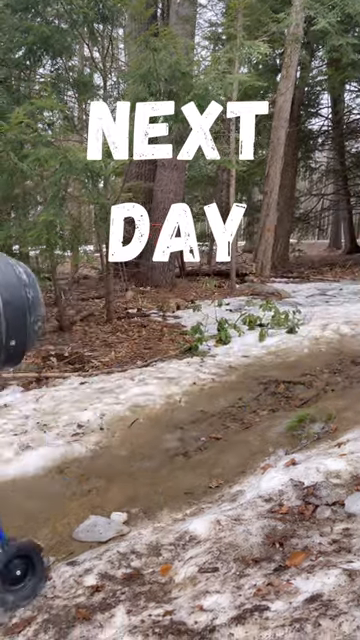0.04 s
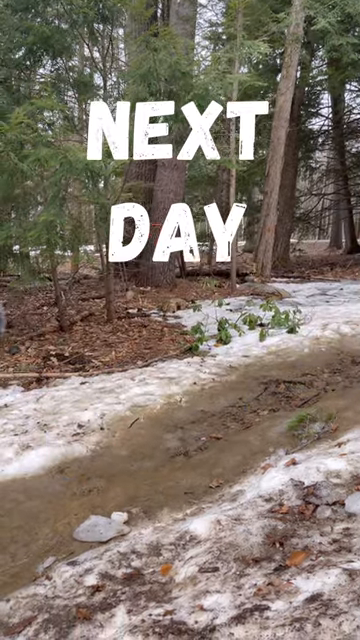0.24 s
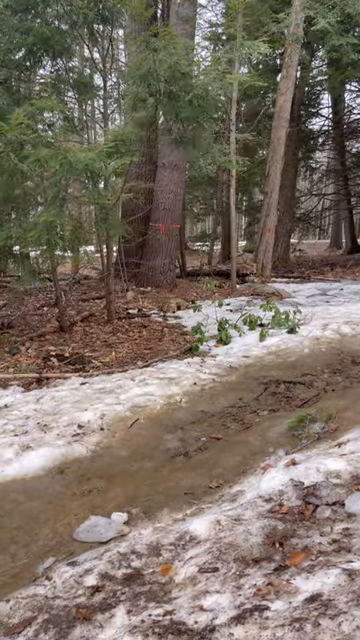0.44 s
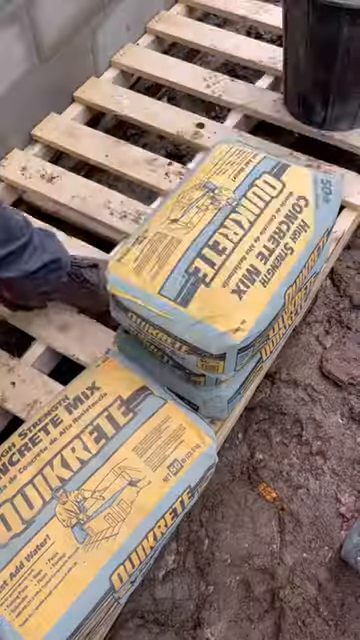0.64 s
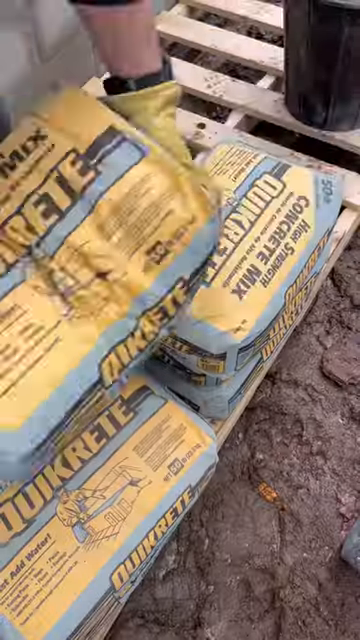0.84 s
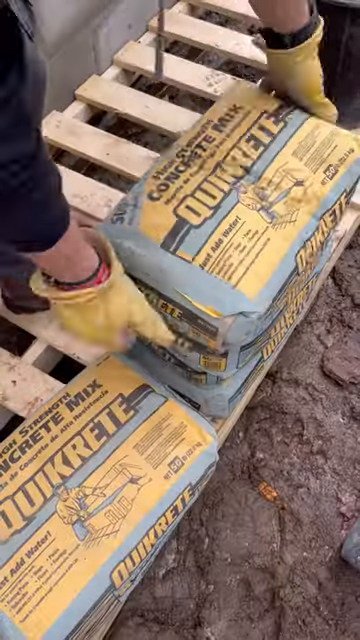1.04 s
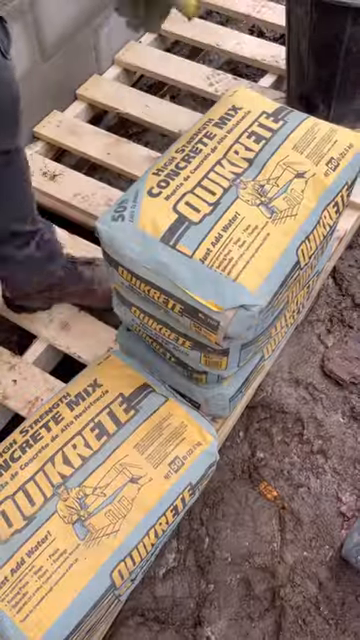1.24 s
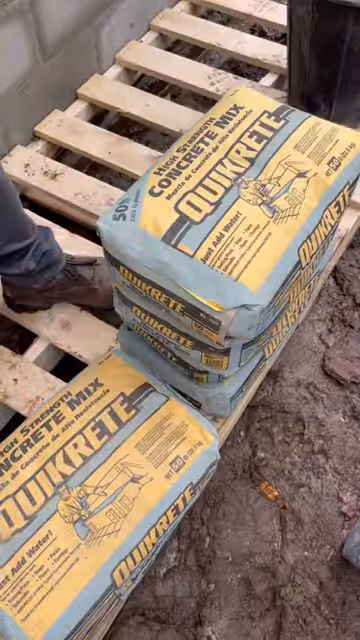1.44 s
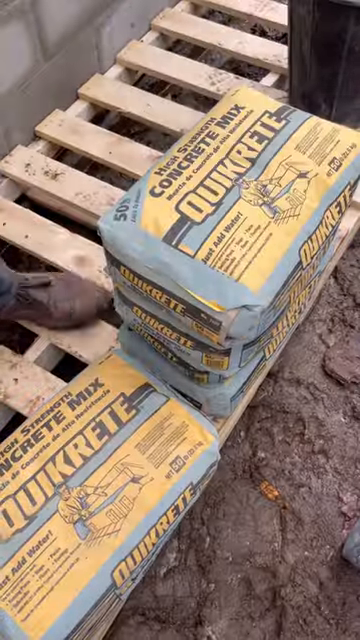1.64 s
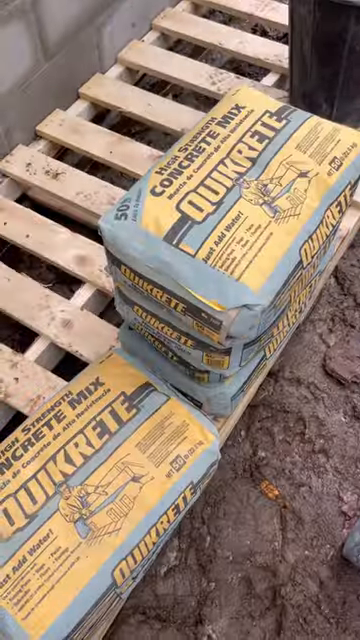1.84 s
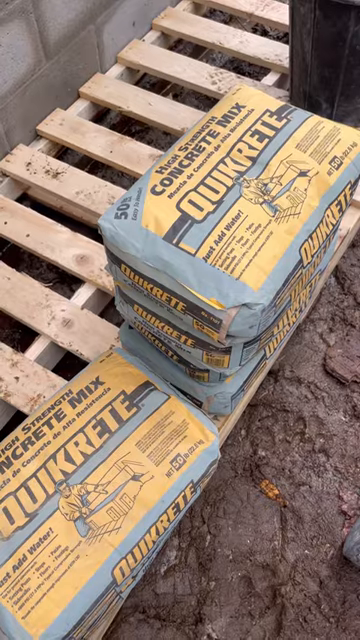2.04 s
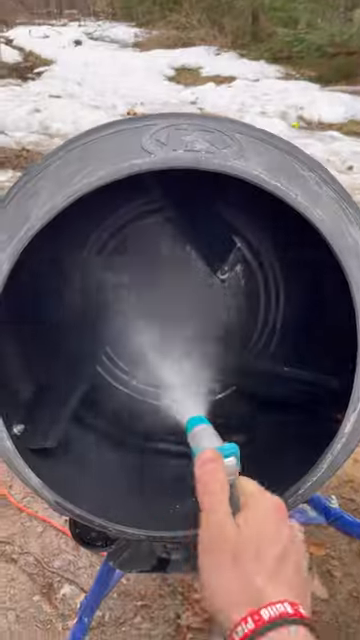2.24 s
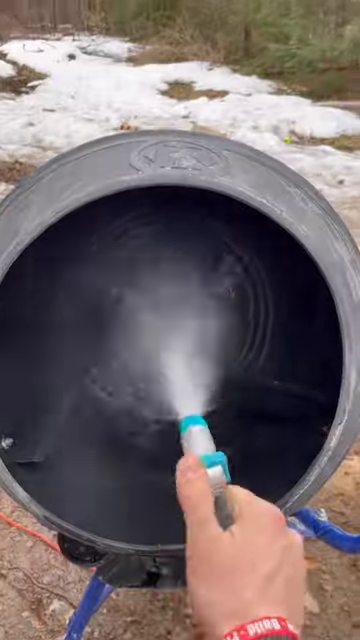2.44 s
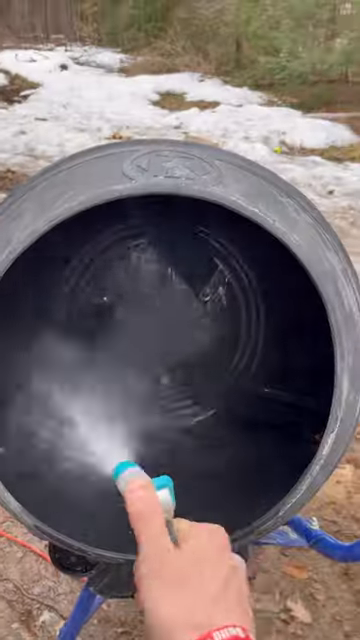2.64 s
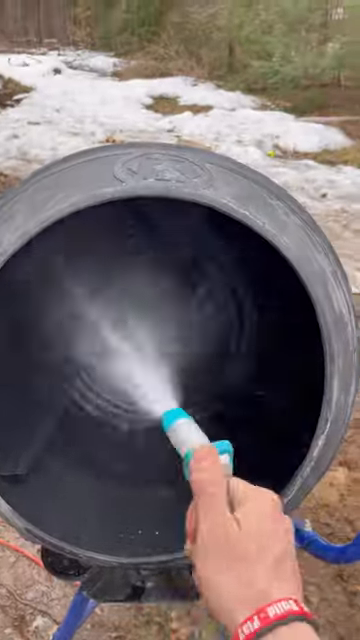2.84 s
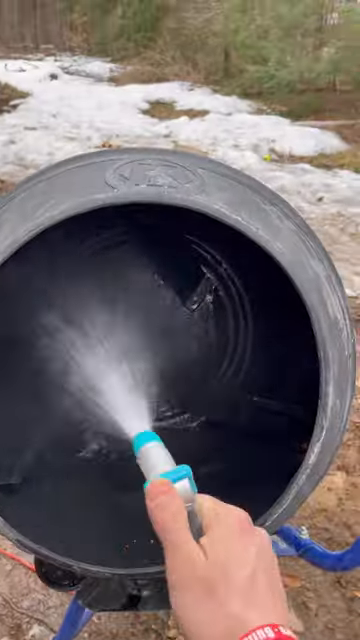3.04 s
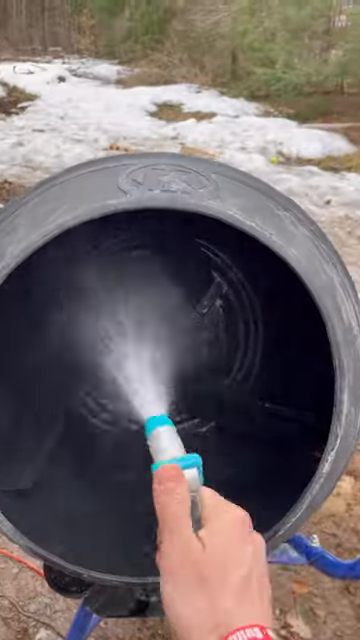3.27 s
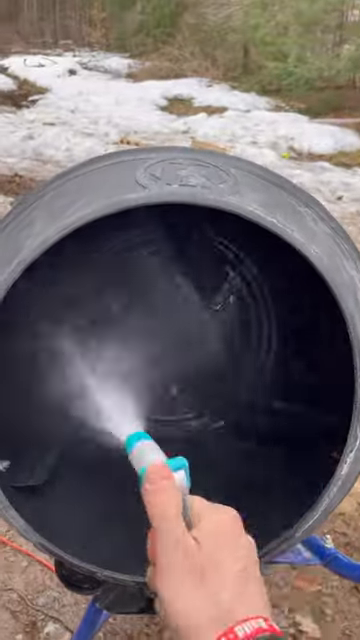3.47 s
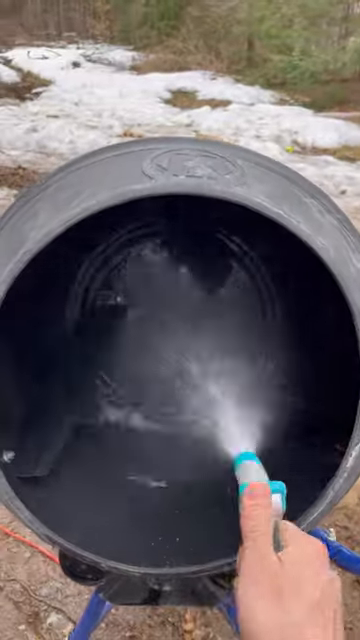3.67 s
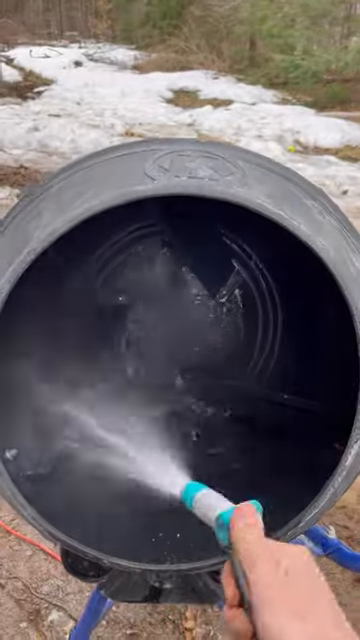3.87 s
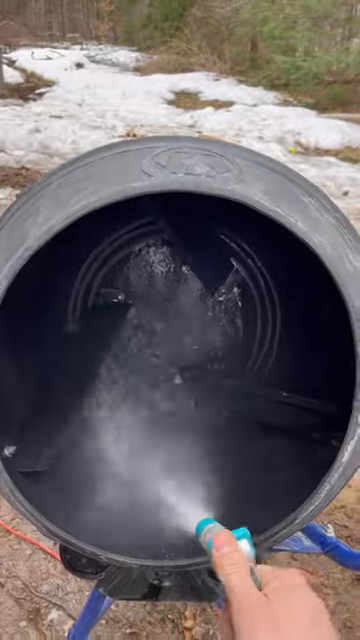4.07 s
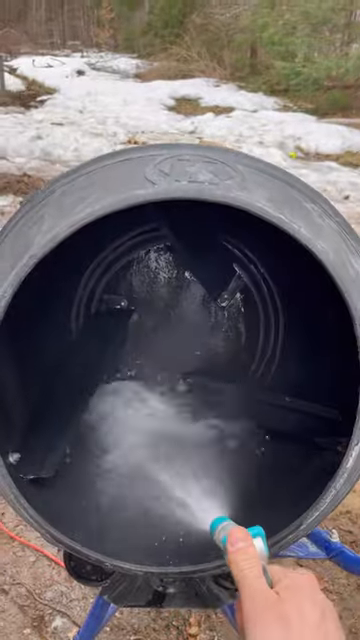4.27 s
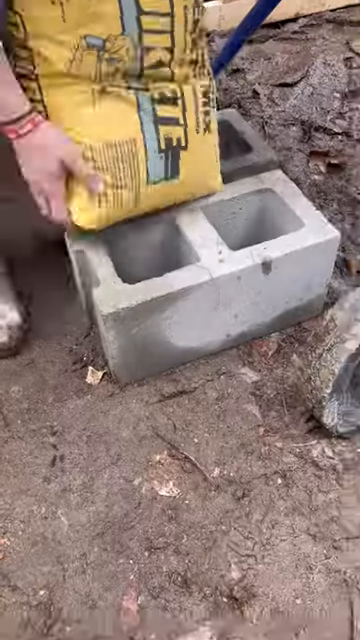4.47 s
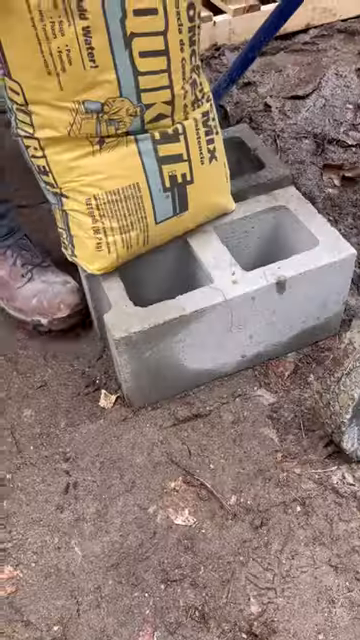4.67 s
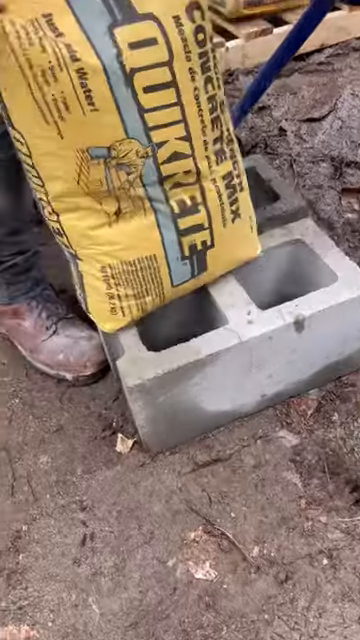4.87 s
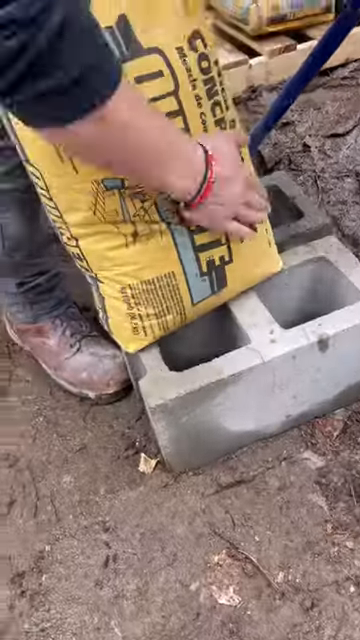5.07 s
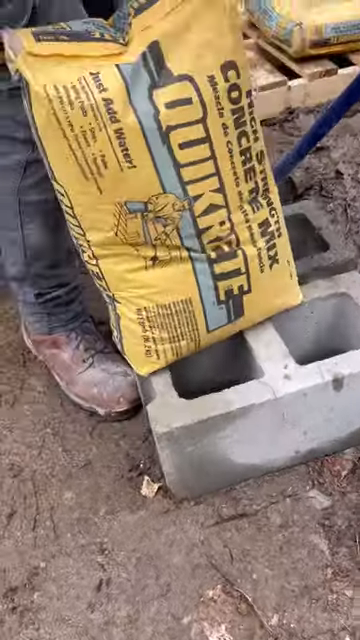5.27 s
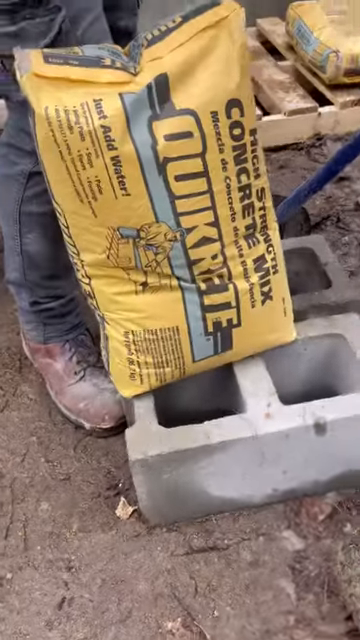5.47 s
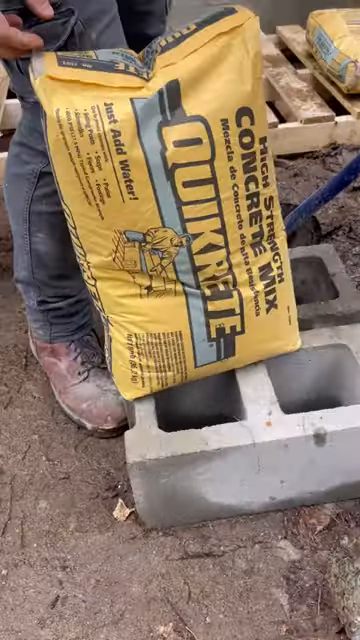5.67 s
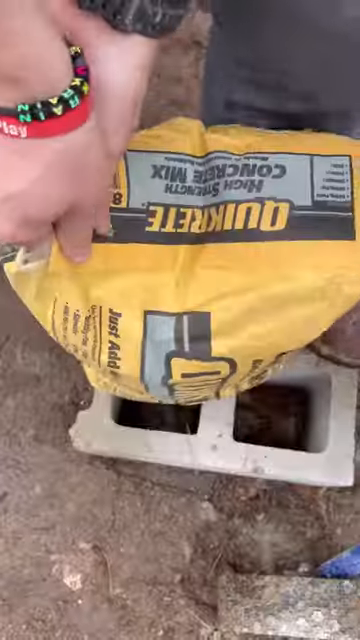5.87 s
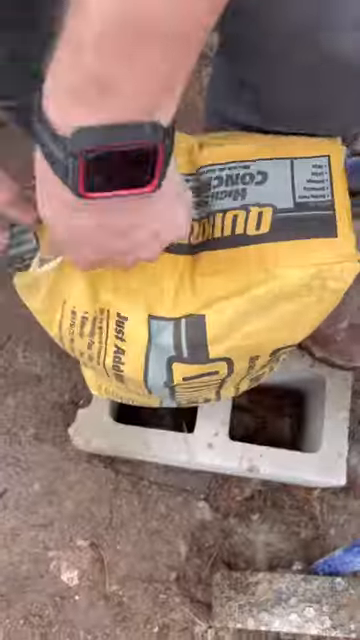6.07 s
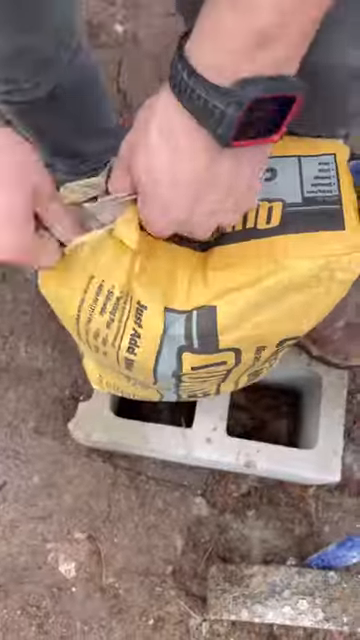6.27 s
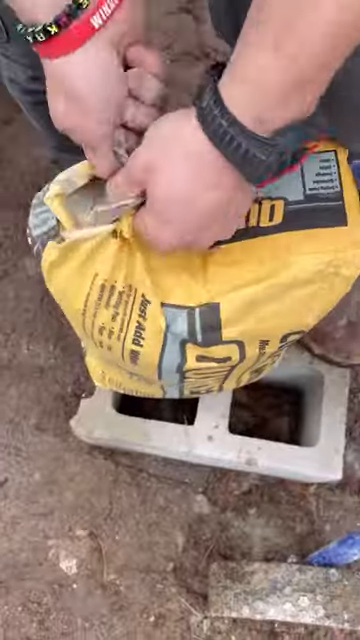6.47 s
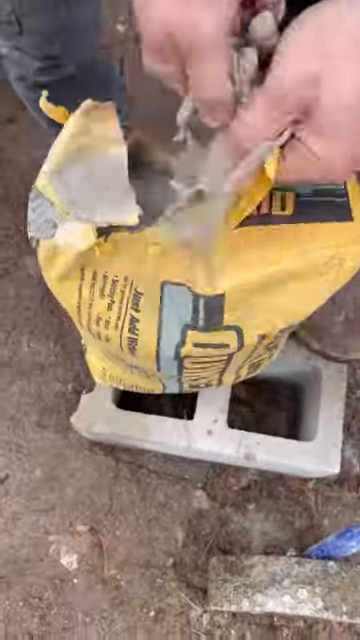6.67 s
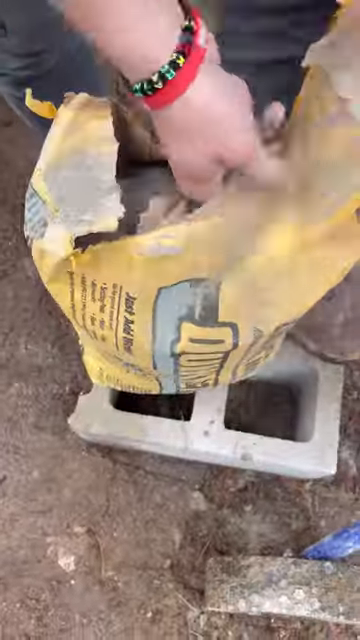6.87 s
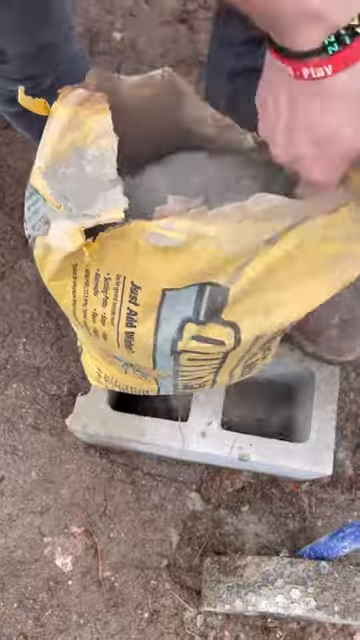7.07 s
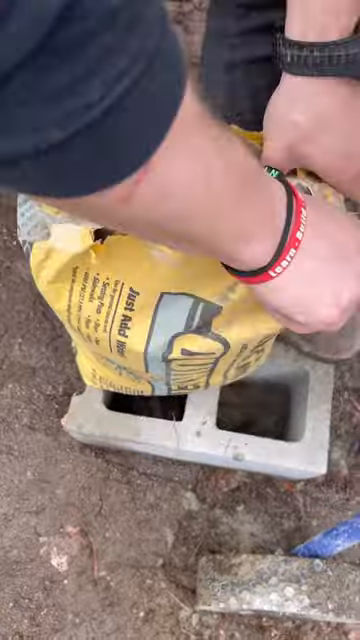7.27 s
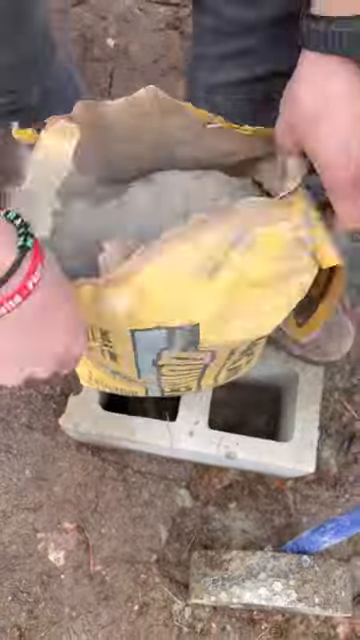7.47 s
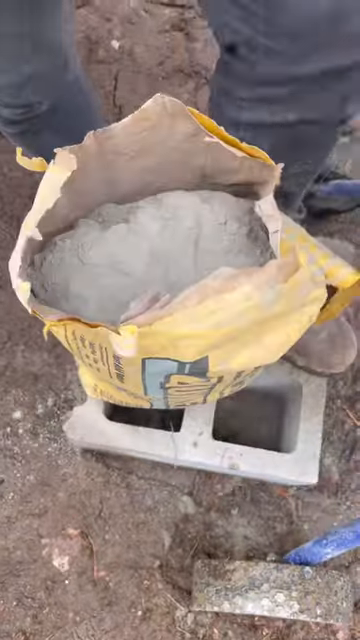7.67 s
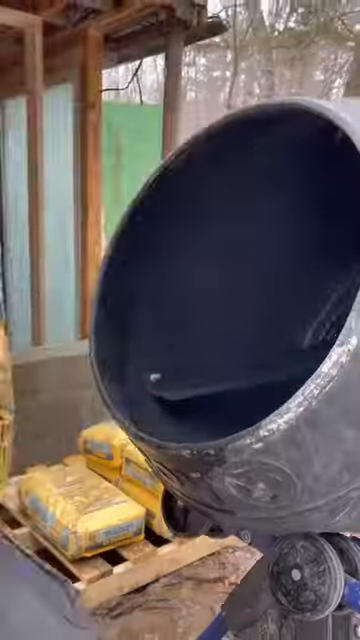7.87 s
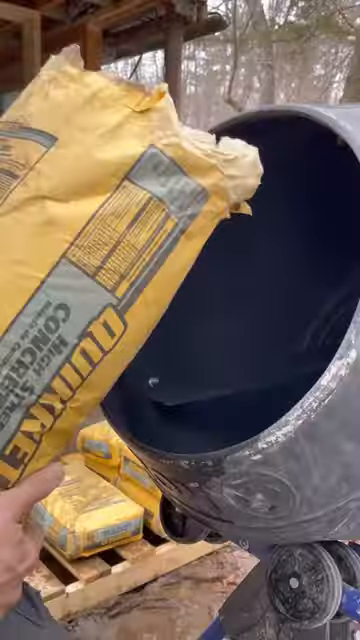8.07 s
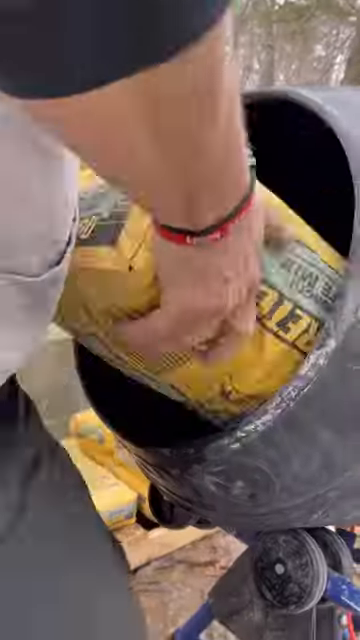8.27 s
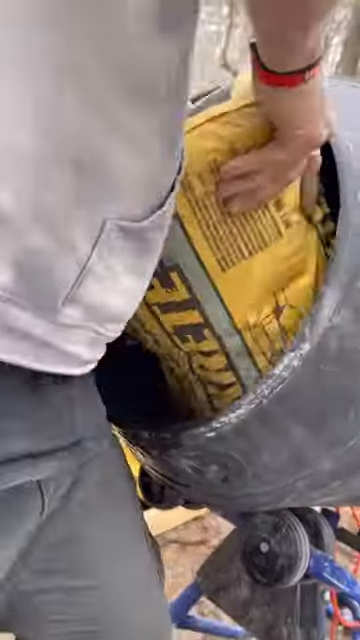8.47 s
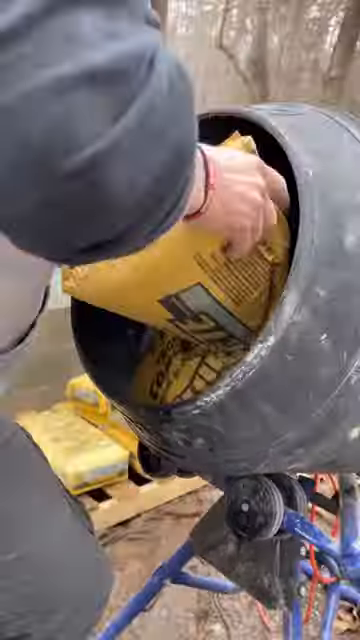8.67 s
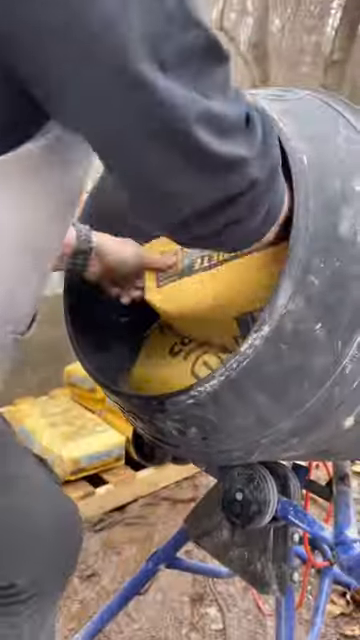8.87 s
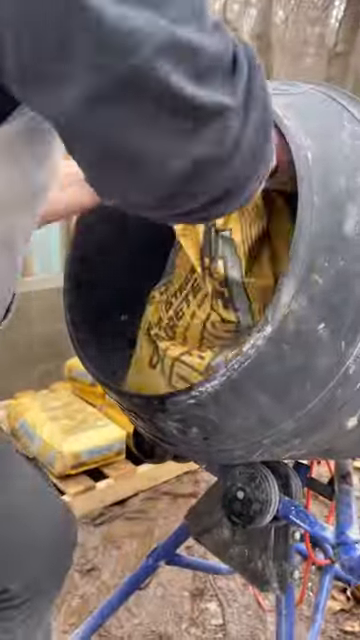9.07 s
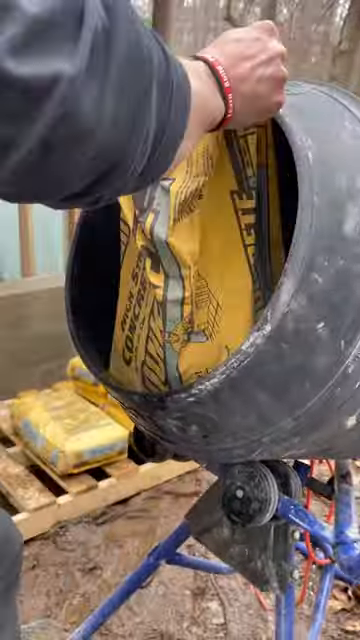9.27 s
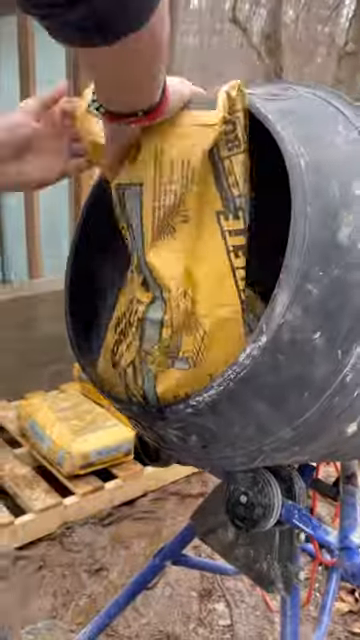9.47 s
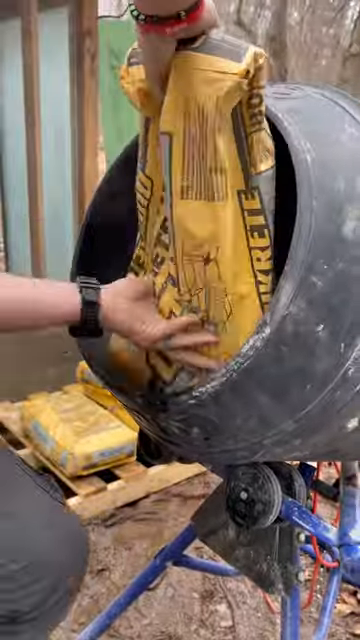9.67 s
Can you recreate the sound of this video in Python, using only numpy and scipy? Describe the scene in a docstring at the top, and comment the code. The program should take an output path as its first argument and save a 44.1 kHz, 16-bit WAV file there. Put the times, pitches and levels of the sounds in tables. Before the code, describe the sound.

Close, dry outdoor sound in hard-cut scenes over very faint air. From 0 to 0.6 s a wheeled mixer rattles: hollow metallic knocks, a wavering low drum boom and gritty snow crunch. Until 2.1 s, cloth and boots scuff softly over a faint low drone; a heavy bag lands with a deep scraping thud at 1.05, with a few small snaps and a dull knock near 2.05. At 2.2 a trigger clicks and spray hisses, fluttering and splattering in a hollow plastic drum, brighter after 4.0, stopping at 4.4. A paper bag then knocks and crackles onto a block. From 5.8 to 7.7 sharp creases snap, fibres rip in short dense bursts and panels pop, with tiny squeaks at 7.8. From 8.1 the bag rustles hollowly in the drum; gritty mix rushes at 8.3, thinning after 8.8, with a loud snap at 8.76 and shakes until 9.7.

```python
"""A heavy paper bag of dry concrete mix is stood on a block and torn open: creases crack, fibres break in
dense runs, panels buckle with dull pops. It is heaved into a drum, where grains of mix slide out.
Before that, in short scenes, a portable mixer knocks and rings over snow and rough ground, a bag thuds on
a stack of others, and a hose sprays hissing, splattering noise into the empty plastic drum.
A faint outdoor background and a low drone lie underneath."""
import sys
import numpy as np
from scipy import signal
from scipy.fft import rfft, irfft
from scipy.io import wavfile
from scipy.ndimage import uniform_filter1d

SR = 44100
rng = np.random.default_rng(int(sys.argv[2]) if len(sys.argv) > 2 else 0)


def wav_out(sig):
    """Save sig, one row per channel (or a flat mono array), as 16-bit PCM at SR to the path in sys.argv[1]."""
    wavfile.write(sys.argv[1], SR, np.round(np.clip(np.atleast_2d(sig).T, -1, 1) * 32767).astype(np.int16))


N = 428652
TIME = np.arange(N) / SR
TRIGGER_S, SPRAY_END_S = 2.214, 4.393   # the hose trigger is pulled, and the spray ends


def from_db(db):
    """Turn decibels into a gain."""
    return 10 ** (np.asarray(db) / 20)


def rms_one(x):
    """Scale a sound so that its average (rms) level is 1."""
    return x / np.sqrt(np.mean(x ** 2) + 1e-20)


def during(start_s, end_s):
    """1 between two times, else 0."""
    return (TIME >= start_s) * (TIME < end_s) * 1.0


def gains(rows):
    """Turn each dB column of a curve into a gain that moves with time."""
    s, *columns = np.transpose(rows)
    return [from_db(np.interp(TIME, s, column)) for column in columns]


def swells(rows, edge_s):
    """Turn each dB column of (start_s, length_s, level_db..) strokes into a gain with soft edges."""
    out = np.zeros((len(rows[0]) - 2, N))
    for s, length, *levels in rows:
        first, last = max(int(s * SR), 0), int((s + length) * SR)
        out[:, first:last] += from_db(levels)[:, None]
    return uniform_filter1d(out, max(int(edge_s * SR), 1), axis=1)


def add(out, s, sound):
    """Mix a short sound in at time s."""
    at = int(np.clip(s * SR, 0, N - 1))
    out[at:at + len(sound)] += sound[:N - at]


def colour(x, spectrum, size=4096):
    """Filter a sound to follow a (pitch_hz, level_db) curve, with no sound ahead of its cause."""
    hz, db = np.transpose(spectrum)
    grid = np.maximum(np.fft.rfftfreq(size, 1 / SR), 1)
    log_gain = np.log(from_db(np.interp(np.log(grid), np.log(hz), db)))
    # folding the cepstrum gives the minimum-phase filter
    cepstrum = irfft(log_gain)
    cepstrum[1:size // 2] *= 2
    cepstrum[size // 2 + 1:] = 0
    return signal.oaconvolve(x, irfft(np.exp(rfft(cepstrum))))[:len(x)]


def resonate(x, hz, width_hz):
    """Pass a sound through one resonance with gain 1 at its top."""
    r = np.exp(-np.pi * width_hz / SR)
    feed = np.array([1, 0, -1]) * (1 - r * r) / 2
    return signal.lfilter(feed, [1, -2 * r * np.cos(2 * np.pi * hz / SR), r * r], x + 1e-18)


def body(x, modes):
    """Let (pitch_hz, width_hz, level_db) resonances ring side by side; little below the first; rms 1."""
    rung = sum(from_db(db) * resonate(x, hz, width) for hz, width, db in modes)
    lowest = signal.butter(3, modes[0][0] * 0.75, "high", fs=SR, output="sos")
    return rms_one(signal.sosfilt(lowest, rung))


def drift(per_s):
    """Wander at random, moving to per_s new values a second; rms 1."""
    knots = rng.standard_normal(N // 20)
    return rms_one(np.interp(TIME * per_s, np.arange(len(knots)), knots))


def random_clicks(sizes, per_s, clump_db):
    """Scatter single clicks at random, with a wandering level that makes them clump."""
    return sizes * (rng.random(N) < per_s / SR) * from_db(clump_db * drift(170))


def grains(per_s, spread_db, clump_db):
    """Clumped tiny noise bursts of uneven size, each with a faint tail; level evened."""
    sizes = from_db(spread_db * np.minimum(rng.exponential(1, N), 4))
    clicks = random_clicks(sizes, per_s, clump_db)
    t = TIME[:SR // 200]
    fade = np.exp(-t / 0.00019) + 0.3 * np.exp(-t / 0.0027)
    energy = signal.oaconvolve(clicks ** 2, fade ** 2)[:N]
    x = np.sqrt(np.abs(energy)) * rng.standard_normal(N)
    return x / np.sqrt(uniform_filter1d(x * x, SR // 25) + 1e-6 * np.mean(x * x))


def creases(per_s, spread_db, clump_db, count=14):
    """Clumped sharp cracks of uneven size, shared out among fixed pitches; level evened."""
    sizes = from_db(spread_db * np.minimum(rng.exponential(1, N), 4)) * rng.choice([-1, 1], N)
    clicks = random_clicks(sizes, per_s, clump_db)
    dealt = rng.integers(0, count, N)
    pitches = np.geomspace(800, 14000, count)
    x = sum(resonate(clicks * (dealt == k), hz, hz * .7) for k, hz in enumerate(pitches))
    return x / np.sqrt(uniform_filter1d(x * x, SR // 20) + 1e-6 * np.mean(x * x))


def widen(x, width):
    """Stereo: the sound reaches the two sides a little unequally, in a wandering way."""
    side = colour(x * drift(410), width)
    return np.array([x + side, x - side])


def echoes(x, t60, wet_db):
    """Add dense early reflections from close surfaces, which fall 60 dB in t60 seconds."""
    t = TIME[:SR // 4]
    tail = rng.standard_normal(len(t)) * from_db(-60 * t / t60) * (t > .002)
    return x + from_db(wet_db) * signal.oaconvolve(x, tail / np.linalg.norm(tail))[:N]


def shimmer(x, depth_db, per_s, count=9):
    """Each band wavers in level on its own, so the colour keeps shifting."""
    edges_hz = np.geomspace(400, 10000, count)
    lows = [signal.sosfiltfilt(signal.butter(3, hz, fs=SR, output="sos"), x) for hz in edges_hz]
    bands = np.diff([0 * x] + lows + [x], axis=0)
    return sum(band * rms_one(from_db(depth_db * drift(per_s))) for band in bands)


# colour of the outdoor background: (pitch_hz, relative level_db)
AIR_COLOUR = [(30,-34),(200,-9.5),(16000,-37)]


def air():
    """Outdoor background: steady soft noise, silent while the hose sprays."""
    noise = rms_one(colour(rng.standard_normal(N), AIR_COLOUR))
    return from_db(-74.5) * (1 - during(TRIGGER_S, SPRAY_END_S)) * noise


def rumble():
    """A faint low drone around the stack of bags: noise through two low resonances."""
    drone = body(rng.standard_normal(N), [(90, 40, -11.0), (133, 29, -3.0)])
    return from_db(-71.5) * (TIME > .575) * (TIME < 2.12) * drone


CLOTH_FROM_S, CLOTH_UNTIL_S, CLOTH_DB = .575, 1.92, -64.5   # clothes rustling by the stack, middle level
# boots and sleeves scuffing: (start_s, length_s, level_db)
SCUFF_STROKES = [(.575,0.14,-58), (.86,0.041,-48.5), (1.02,0.12,-43), (1.04,0.055,-33), (1.39,0.093,-54.5),
                 (1.888,0.035,-49.5)]


def shuffling():
    """Soft, uneven scuffs of cloth and soles on grit: fine grains with a wandering level."""
    cloth = from_db(CLOTH_DB + 2 * drift(26)) * during(CLOTH_FROM_S, CLOTH_UNTIL_S)
    level = (cloth + swells(SCUFF_STROKES, 0.0096)[0]) * from_db(2.5 * drift(45))
    soft = [(100, -2.0), (500, -4.5), (1200, -6), (5000, -5.5), (9800, -13.0), (13000, -6.0)]
    return level * rms_one(colour(grains(5300, 2.9, 1.7), soft))


# heavy dull blows of bag and boots: (start_s, level_db, pitch_hz, fall_by_60_db_s)
HEAVY_BLOWS = [(1.05,-20.5,131,0.11),(1.078,-29,113,0.17),(1.891,-41.5,168,0.13),(2.052,-27,150,0.034),(7.278,-34.5,238,0.072)]


def thuds():
    """A heavy soft contact sets a low, quickly damped swing going."""
    out, t = np.zeros(N), TIME[:SR // 3]
    for s, db, hz, t60 in HEAVY_BLOWS:
        rough = resonate(resonate(rng.standard_normal(len(t)), hz, 160), hz, 200)
        swing = np.sin(2 * np.pi * hz * t) + 0.53 * rms_one(rough)
        soft_start = np.minimum(t / .004, 1)
        add(out, s, from_db(db) * swing * from_db(-60 * t / t60) * soft_start)
    return out


# the mixer's frame knocking over bumps: (start_s, level_db before a common 21.5 dB cut)
FRAME_JOLTS = [(0.056, -17.5), (0.147, -12), (0.192, -20.5), (0.253, -14), (0.304, -17), (0.356, -13.5),
               (0.442, -10), (0.501, -9), (0.55, -14)]
# notes of the frame, each knock shifting them a little: (pitch_hz, relative level_db, fall_by_60_db_s)
FRAME_NOTES = [(591,-3,0.056),(762,0,0.067),(865,0,0.064),(1128,-9.5,0.055),(1346,-16.5,0.15),(1740,-13,0.07)]
# low notes of the shaking drum: (pitch_hz, width_hz, relative level_db)
DRUM_BOOM = [(130,40,-1.5),(189.5,33,2)]
# level of the drum's boom while rolling: (time_s, level_db)
BOOM_LEVEL = [(0.0, -34.5), (0.2, -37), (0.23, -49), (0.275, -32), (0.47, -34), (0.57, -39.5)]
# wheels breaking the snow crust: (start_s, length_s, level_db)
CRUST_CRUNCHES = [(0.122,0.024,-31.5), (0.24,0.021,-26), (0.349,0.0099,-23), (0.39,0.034,-32)]
# colour of the crunching snow: (pitch_hz, relative level_db)
SNOW_COLOUR = [(70,-8),(400,12),(4000,-0.5),(13000,1.5),(16000,-1)]
BOOM_HZ = 222   # the boom's main note, which wavers
RATTLE_DB, RATTLE_RISE_DB_PER_S = -45.5, 12.5   # the loose frame rattles more as the mixer gathers speed
SNOW_FROM_S, GRIT_DB = 0.15, -36   # the wheels reach the snow and grind through it


def frame_knocks():
    """Each bump strikes the loose frame, which rings at its own notes and chatters."""
    knocks, t = np.zeros(N), TIME[:SR // 6]
    for s, db in FRAME_JOLTS:
        chatter = rng.standard_normal(len(t)) * np.exp(-t / 0.0072)
        ring = 0
        for hz, level, t60 in FRAME_NOTES:
            gain = from_db(level + rng.normal(0, 2))
            turns = hz * rng.normal(1, 0.0194) * t + rng.random()
            ring = ring + gain * np.sin(2 * np.pi * turns) * from_db(-60 * t / t60)
        ring = rms_one(ring * (1 - np.exp(-t / 0.0022)))
        knock = ring + 0.49 * rms_one(resonate(chatter, 1100, 1300))
        add(knocks, s, from_db(db - 21.5) * rms_one(knock))
    return knocks


def wheeled_mixer():
    """The frame knocks and rattles, the drum booms on a wavering note and the wheels crunch."""
    note = np.sqrt(2) * np.sin(2 * np.pi * np.cumsum(BOOM_HZ * (1 + 0.03 * drift(29.6))) / SR)
    shake = note + from_db(-3) * body(grains(500, 2.5, 0.88), DRUM_BOOM)
    boom = gains(BOOM_LEVEL)[0] * shake
    rattle = from_db(RATTLE_DB + RATTLE_RISE_DB_PER_S * np.minimum(TIME, 1))
    frame = [(hz, 5 / t60, db) for hz, db, t60 in FRAME_NOTES]   # faster fading, wider resonance
    loose = rattle * body(grains(1100, 2.0, 4.1), frame)
    grit = from_db(GRIT_DB - 12.0 * (TIME < SNOW_FROM_S))
    snow = rms_one(colour(grains(6100, 1.4, 4.1), SNOW_COLOUR))
    crunch = (grit + swells(CRUST_CRUNCHES, 0.0032)[0]) * snow
    return (frame_knocks() + boom + loose + crunch) * np.interp(TIME, [.573, .579], [1, 0])


# hiss level as the spray swings about the drum, before flutter: (time_s, level_db)
SPRAY_LEVEL = [(2.25, -41.5), (2.4, -34.5), (2.9, -37.5), (3.44, -35.5), (3.78, -38.5), (3.87, -39),
               (4.04, -39), (4.12, -35), (4.39, -39.5)]
# colour of the hiss: (pitch_hz, relative level_db)
HISS_COLOUR = [(1200,-36.5),(2400,-6),(4500,4),(6200,0),(8000,3),(14500,1.5),(16000,-6.5)]
# the jet sweeping across the paddles: (start_s, length_s, splatter level_db)
PADDLE_SPLASHES = [(2.272, 0.073, -33.5), (2.47, 0.081, -45.5), (3.17, 0.027, -41), (3.37, 0.031, -39.5),
                   (3.695, 0.091, -38.5)]
# the wet drum's cavity: (pitch_hz, width_hz, relative level_db)
DRUM_CAVITY = [(1575,77,5),(1820,310,7),(2000,300,8.5),(3160,150,4),(4150,460,9.5),(4820,200,8),(8100,330,4.5)]
# the wet drum's wall: (pitch_hz, width_hz, relative level_db)
DRUM_WALL = [(357,31,-6.5),(461,23,-5.5),(530.4,34,3),(715,62,-15.5)]
OPENING_S = 0.04   # time the spray takes to rise to full level
# before the spray starts: a trace of hiss, this far below full level, and faint dull background noise
QUIET_FROM_S, TRACE_DB, DULL_NOISE_DB = 2.122, -21.5, -59.5
FLUTTER_DB, FLUTTER_PER_S = 1.63, 26   # the flow wavers


def hose():
    """A fine spray hisses and flutters; its drops splatter in the drum's cavity and drum on the wall."""
    shut = 1 - np.clip((TIME - TRIGGER_S) / OPENING_S, 0, 1)
    running = during(QUIET_FROM_S, SPRAY_END_S)
    flow = from_db(TRACE_DB * shut + FLUTTER_DB * drift(FLUTTER_PER_S)) * running
    hiss = gains(SPRAY_LEVEL)[0] * flow
    head_on = np.interp(TIME, [4.04, 4.1], [0, 1])   # aimed at the bottom: brighter, less drumming
    mist = rms_one(colour(grains(20000, 3.5, 1.0), HISS_COLOUR))
    mist = mist + 0.5 * head_on * resonate(mist, 12700, 6000)
    steady_splatter = from_db(-46.0 + 2 * drift(22.25)) * running * (1 - shut)
    splatter = steady_splatter + swells(PADDLE_SPLASHES, 0.0084)[0]
    drops = body(grains(2000, 1.9, 1.24), DRUM_CAVITY)
    patter = grains(2500, 1.0, 0.88)
    wall = body(patter, DRUM_WALL) * hiss * from_db(-14.0 - 3.9 * head_on + 2.3 * drift(22.19))
    dull_noise = body(resonate(patter, 400, 2400), [(330, 360, 0)])
    background = from_db(DULL_NOISE_DB) * running * shut * dull_noise
    in_cavity = echoes(hiss * mist + splatter * drops, t60=.04, wet_db=-9)
    return shimmer(in_cavity + wall + background, depth_db=1.8, per_s=24)


# the mix rushing out as the bag is tipped: (start_s, length_s, level_db)
MIX_SURGES = [(8.29,0.058,-31.5), (8.52,0.077,-42)]
SLIDE_S, SLIDE_RISE_S, EMPTY_S = 8.28, 0.086, 8.82   # the mix breaks loose, and has run out
POUR_DB = -39.5   # steady flow
TRICKLE_DB, TRICKLE_FADE_DB_PER_S = -45, 18   # what is left in the folds
MOUTH_FULL_HZ, MOUTH_EMPTY_HZ, MOUTH_SINK_S = 3800, 2050, 0.13


def sliding_mix():
    """Sand and gravel surge through the bag's mouth, pour, then trickle; the mouth's resonance sinks."""
    age = np.maximum(TIME - SLIDE_S, 0)
    trickle_db = TRICKLE_DB - TRICKLE_FADE_DB_PER_S * (TIME - EMPTY_S)
    flow = from_db(np.where(TIME < EMPTY_S, POUR_DB, trickle_db))
    level = np.minimum(age / SLIDE_RISE_S, 1) * flow + swells(MIX_SURGES, 0.023)[0]
    centre = MOUTH_EMPTY_HZ + (MOUTH_FULL_HZ - MOUTH_EMPTY_HZ) * np.exp(-age / MOUTH_SINK_S)
    rush, out = grains(6000, 2.8, 2.2), 0
    # fixed bands fade in and out as the resonance passes them
    for k, band_hz in enumerate(np.geomspace(1400, 5000, 10)):
        near = np.exp(-(np.log(band_hz / centre) / 0.36) ** 2)
        shifted = np.roll(rush, k * SR // 10)   # so that the bands do not move together
        band = resonate(resonate(shifted, band_hz, band_hz * 0.23), band_hz, band_hz * 0.23)
        out = out + near * rms_one(band)
    return level * out


# the bag squeaking as it rubs: (start_s, length_s, level_db, starting pitch_hz, overtone_fall_db_per_octave)
BAG_SQUEAKS = [(5.621,0.016,-42,522,3.5),(7.761,0.016,-35.5,475,16),(7.781,0.029,-34.5,530,9.5)]


def squeaks():
    """Paper sticks and slips in a short, uneven chirp of rising pitch."""
    out = np.zeros(N)
    for s, length, db, hz, fall_db in BAG_SQUEAKS:
        along = np.linspace(0, 1, int(length * SR))
        pitch = hz * (1 + .25 * along) * (1 + .11 * drift(700)[:len(along)])
        phase = 2 * np.pi * np.cumsum(pitch) / SR
        grip = from_db(3 * drift(200)[:len(along)] - 2)
        slips = sum(from_db(-fall_db * np.log2(k)) * np.sin(k * phase) for k in range(1, 6))
        add(out, s, from_db(db) * grip * np.sqrt(np.abs(np.sin(np.pi * along))) * slips)
    return out


BEND_LAG_S, BEND_LAG_HZ = 0.00508, 503   # a bending wave of this pitch takes this long to cross the sheet
BEND_LOWEST_HZ = 180   # the sheet radiates little below this


def bend(hz, size=2048):
    """A smooth bending pulse around hz; its highs arrive first, so it falls in pitch. Peak 1."""
    f = np.fft.rfftfreq(size, 1 / SR)
    hump = ((f / hz) ** 2 * np.exp(-(f / hz) ** 2)) ** 0.9
    weight = hump * f ** 4 / (f ** 4 + BEND_LOWEST_HZ ** 4)
    pulse = irfft(weight * np.exp(-4j * np.pi * BEND_LAG_S * np.sqrt(BEND_LAG_HZ * f)))
    return pulse / np.abs(pulse).max()


# dull pops of the bag buckling, boots knocking, and the hose nozzle and trigger:
# (start_s, peak level_db, pitch_hz)
DULL_POPS = [(2.049, -34, 1010), (2.121, -50, 470), (2.234, -39.5, 540), (4.428, -25, 890),
             (4.53, -29, 420), (4.552, -27, 395), (4.585, -24.5, 330), (4.647, -28, 418),
             (4.966, -30.5, 825), (4.98, -30, 560), (5.202, -30, 438), (5.252, -33.5, 600),
             (5.393, -38, 654), (5.455, -30, 384), (5.634, -38, 450), (5.755, -30.5, 580),
             (6.174, -33, 931), (6.456, -30.5, 455), (6.74, -25, 600), (6.993, -29.5, 620),
             (7.071, -27.5, 510), (7.235, -25.5, 510), (7.254, -24.5, 1070), (7.468, -28, 1160),
             (7.496, -22.5, 700), (7.611, -19.5, 460), (7.893, -19.5, 1070), (8.817, -19, 627),
             (9.645, -20, 634)]


def pops():
    """Dull pops of bag, boots, hose nozzle and trigger: each is one pulse that falls in pitch."""
    out = np.zeros(N)
    for s, db, hz in DULL_POPS:
        add(out, s, from_db(db) * bend(hz))
    return out


BUCKLES_PER_S = 900


def small_buckles(count=8):
    """Many faint pops from panels of different sizes merge into a dull, uneven rustle; rms 1."""
    clicks = (rng.random(N) < BUCKLES_PER_S / SR) * rng.choice([-1, 1], N) * from_db(3 * drift(90))
    dealt = rng.integers(0, count, N)
    rustle = 0
    for k, hz in enumerate(np.geomspace(260, 1000, count)):
        rustle = rustle + signal.oaconvolve(clicks * (dealt == k), bend(hz))[:N]
    return rms_one(rustle)


# short sharp snaps, mostly paper creases, also the click of the hose trigger:
# (start_s, level_db before a common 0.4 dB cut, pitch_hz)
SHARP_SNAPS = [(0.9577, -34.5, 2050), (1.1334, -15, 3400), (1.1646, -18, 2940), (2.236, -29, 2500),
               (4.639, -21, 4630), (4.746, -19.5, 8620), (4.762, -22.5, 1920), (4.776, -20.5, 5000),
               (5.1404, -21.5, 9730), (5.2, -15, 1930), (5.341, -24, 4000), (5.69, -34, 1670),
               (5.8006, -12, 4270), (5.8337, -8, 4500), (5.845, -17, 4170), (5.863, -12, 5360),
               (5.888, -13, 3180), (5.908, -20, 5680), (5.9276, -12.5, 2950), (5.97, -11.5, 3150),
               (6.031, -20.5, 4430), (6.2163, -13, 10600), (6.27, -20.5, 10500), (6.2882, -23, 4000),
               (6.357, -13.5, 4180), (6.408, -19, 6800), (6.52, -14, 6900), (6.54, -14.5, 2250),
               (6.5785, -18, 6490), (6.911, -12, 9020), (6.993, -10, 4420), (7.1115, -22, 7550),
               (7.354, -18, 4000), (7.3764, -17, 8100), (7.672, -26, 8800), (7.691, -27, 4140),
               (8.7614, -6.5, 2100)]


def snaps():
    """Short sharp snaps, mostly paper creases: a very short crack, then a brief fainter crackle."""
    out, t = np.zeros(N), TIME[:SR // 30]
    for s, db, hz in SHARP_SNAPS:
        shape = .55 * np.exp(-t / .0009) + .03 * np.exp(-t / .004)
        crack = rng.choice([-1, 1], len(t)) * shape
        crack[0] = 1
        bright = 0.24 * resonate(crack, 1400, 1340) + 0.28 * resonate(crack, 4900, 8900)
        crack = resonate(crack, hz, hz * 0.5) + bright
        add(out, s + .0008, from_db(db - 0.4) * crack / np.abs(crack).max())
    return out


# spells of work on the bag (stand, steady, open, let go, lift, in the drum, empty, shake out twice):
# (start_s, length_s, crisp level_db, dull level_db)
WORK_SPELLS = [(4.415,0.89,-48,-50.5), (5.31,0.76,-63.5,-55), (5.76,1.91,-42.5,-51.5),
               (7.69,0.15,-63.5,-58), (7.83,0.33,-46.5,-52), (8.12,1.6,-40.5,-36.5), (8.14,0.66,-41,-68),
               (8.93,0.41,-41,-39), (9.47,0.2,-38.5,-36.5)]
# the hands squeezing and folding the paper: (start_s, length_s, crisp level_db, dull level_db)
HAND_GRIPS = [(4.52,0.2,-78,-50), (5.01,0.064,-46,-70), (6.07,0.1,-39,-78), (6.405,0.075,-34,-53),
              (7.02,0.1,-45,-53), (7.31,.14,-36.5,-47), (7.53,0.15,-53,-39.5), (7.845,0.034,-44.5,-53)]
# paper tearing: (start_s, length_s, level_db)
PAPER_RIPS = [(5.765,0.026,-31.5), (5.955,0.036,-31.5), (6.346,0.013,-30.5), (6.519,0.018,-24.5),
              (6.594,0.03,-23.5), (6.679,0.016,-24), (6.694,0.067,-26.5), (6.86,0.0094,-22.5),
              (6.91,0.014,-32), (6.939,0.024,-29), (7.066,0.0088,-26), (7.175,0.028,-31.5),
              (7.48,0.035,-31), (7.562,0.013,-25), (7.604,0.013,-20.5)]
# rips sound fuller as the bag gapes wider: (time_s, dull part against the crisp part, level_db)
BAG_GAPE = [(5.75,-19.5), (7.6,-5.5)]
# the bag sliding on the stack and on the block: (start_s, length_s, level_db)
BAG_SCRAPES = [(1.047,.023,-24.5), (1.072,0.0083,-17.5), (4.507,0.013,-28.5), (4.832,0.061,-33.5),
               (5.225,0.019,-34)]
# the bag shoved and shaken in the drum: (start_s, length_s, hollow level_db, crisp level_db), trimmed below
DRUM_SHAKES = [(8.127, 0.066, -30.5, -35), (8.283, 0.061, -30, -22.5), (8.547, 0.063, -30, -29.5),
               (8.758, 0.068, -24, -25.5), (8.96, 0.092, -29, -32.5), (9.183, 0.02, -29, -28),
               (9.261, 0.019, -23.5, -30), (9.485, 0.041, -28, -26.5), (9.57, 0.037, -26.5, -26),
               (9.672, 0.046, -24, -25.5)]
# paper treble: (pitch_hz, relative level_db)
CRISP_COLOUR = [(150,-34),(700,-11.5),(1400,6),(2500,5.5),(3800,7.5),(6000,5),(9000,4.5),(13000,5.5),(16000,-0.5)]
# dull part of rips and scrapes: (pitch_hz, relative level_db)
RIP_BODY_COLOUR = [(100,-34.5),(300,2),(700,6),(1300,6),(3000,-29)]
# drum with the bag in its mouth: (pitch_hz once the mouth is clear, width_hz, relative level_db)
HOLLOW_DRUM = [(350,65,-32),(516,35,20.5),(553,29,19.5),(670,260,-1.5),(850,780,3),(1930,410,6),(2540,270,-6)]
IN_DRUM_S = 8.12   # from here on the bag is inside the drum
SCRAPE_BODY_DB = -8   # dull part against the crisp part


def hollow(x):
    """The drum's resonances: the full bag narrows the mouth and lowers them until it empties."""
    blocked = np.interp(TIME, [8.6, 8.8], [1, 0])
    lowered = [(hz * .91, width, db) for hz, width, db in HOLLOW_DRUM]
    return np.sqrt(blocked) * body(x, lowered) + np.sqrt(1 - blocked) * body(x, HOLLOW_DRUM)


def paper_bag():
    """Handling gives sparse crackle, tearing a dense run of breaking fibres; in the drum it sounds hollow."""
    crisp, dull = swells(WORK_SPELLS, edge_s=.02) + swells(HAND_GRIPS, edge_s=0.023)
    rip, scrape = swells(PAPER_RIPS, .009)[0], swells(BAG_SCRAPES, .006)[0]
    shake_hollow, shake_crisp = swells(DRUM_SHAKES, 0.023)
    in_drum = TIME > IN_DRUM_S

    crackle = rms_one(colour(creases(2600, 3.6, 3.2), CRISP_COLOUR))
    tearing = rms_one(colour(creases(7000, 3.0, 1.8), CRISP_COLOUR))
    rubbing = rms_one(colour(grains(6000, 2.0, 1.5), CRISP_COLOUR))
    fibres = grains(4000, 2.7, 1.8)
    crumple = grains(3500, 4.2, 1.8)

    outside = ~in_drum * (crisp * crackle + dull * small_buckles())
    outside += rip * tearing + scrape * rubbing
    full_level = rip * gains(BAG_GAPE)[0] + scrape * from_db(SCRAPE_BODY_DB)
    outside += full_level * rms_one(colour(fibres, RIP_BODY_COLOUR))

    rustle = [(80, -14), (300, -24.0), (2500, 6.5), (5500, 7.5), (12000, 6.0), (16000, -0.5)]
    inside = crisp * rms_one(colour(crumple, rustle)) + dull * hollow(crumple)
    inside += from_db(-3.0) * shake_crisp * tearing
    inside += from_db(-0.5) * shake_hollow * hollow(fibres)
    return outside + echoes(in_drum * inside + sliding_mix(), t60=0.12, wet_db=-16.5)


# left-right difference of the later scenes: (pitch_hz, level_db)
LATER_WIDTH = [(200,-22),(1500,-48),(8000,-34.5),(15000,1.5)]
# left-right difference of the opening scenes: (pitch_hz, level_db)
OPENING_WIDTH = [(200,-61),(700,-11),(4000,-13.5),(9000,0.5)]
# left-right difference of the spray: (pitch_hz, level_db)
HOSE_WIDTH = [(200,-29),(2000,-52),(6000,-36),(14000,-33)]


def scene():
    """Opening scenes sound wide; later ones are narrow in the mids, and the paper is wide at the very top."""
    paper = shimmer(paper_bag(), depth_db=2.5, per_s=80)
    events = paper + snaps() + pops() + squeaks() + thuds() + shuffling()
    work = echoes(events, t60=0.063, wet_db=-13.5) + air() + rumble()
    opening = TIME < 1.88
    first = widen(wheeled_mixer() + work * opening, OPENING_WIDTH)
    later = widen(work * ~opening, LATER_WIDTH)
    return first + later + widen(hose(), HOSE_WIDTH)


CUTOFF_HZ = 16000


def record(dry):
    """The microphone sheds deep bass; the top is cut."""
    thin = signal.sosfilt(signal.butter(2, 75, "high", fs=SR, output="sos"), dry)
    return signal.sosfilt(signal.ellip(10, .1, 80, CUTOFF_HZ, fs=SR, output="sos"), thin)


dry = scene()
out = record(dry)
wav_out(out)
```